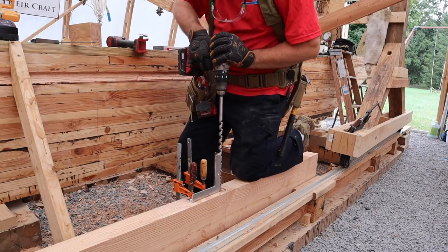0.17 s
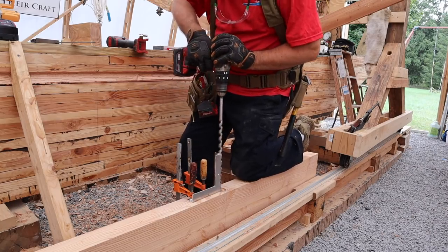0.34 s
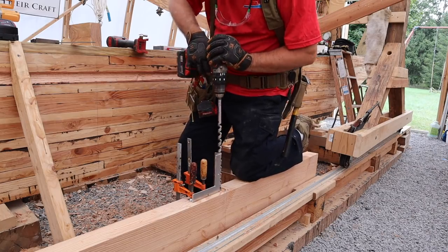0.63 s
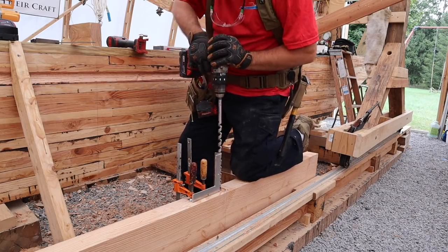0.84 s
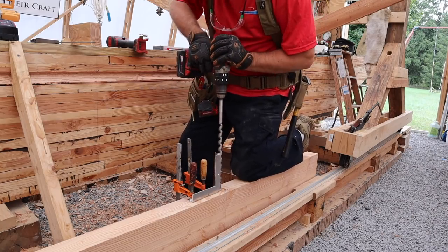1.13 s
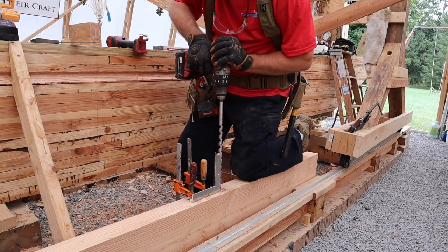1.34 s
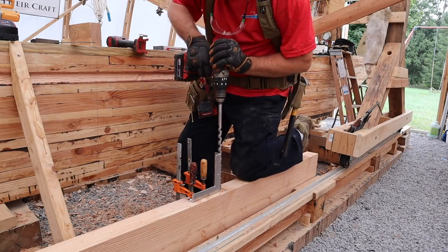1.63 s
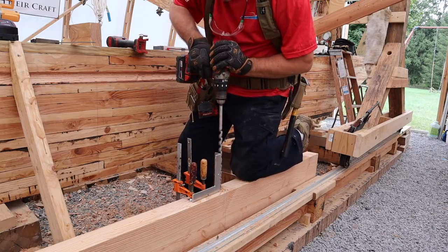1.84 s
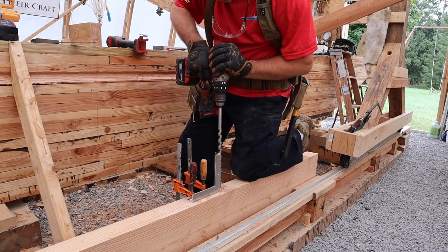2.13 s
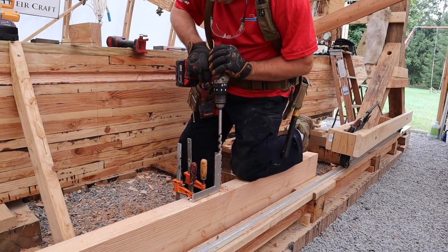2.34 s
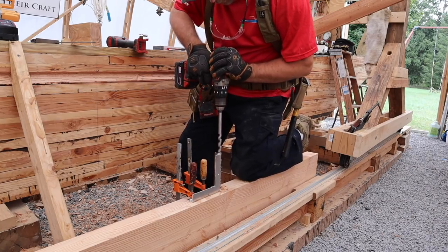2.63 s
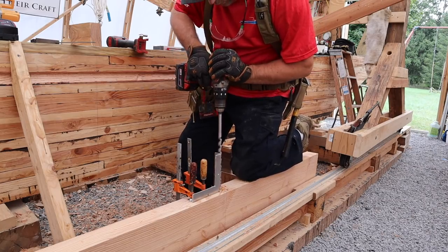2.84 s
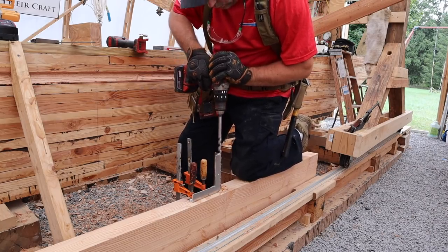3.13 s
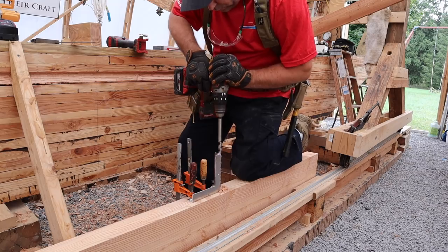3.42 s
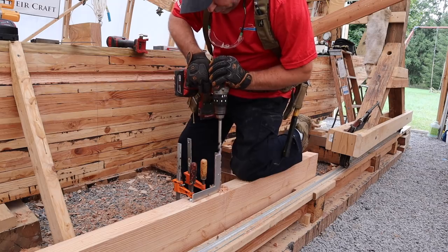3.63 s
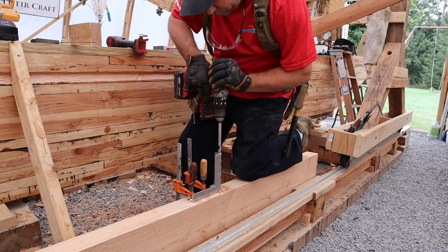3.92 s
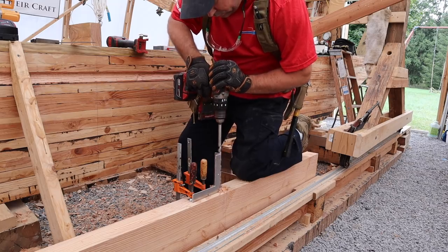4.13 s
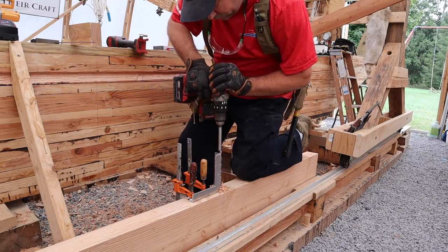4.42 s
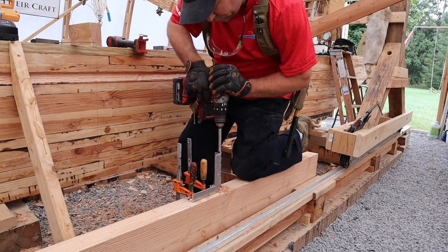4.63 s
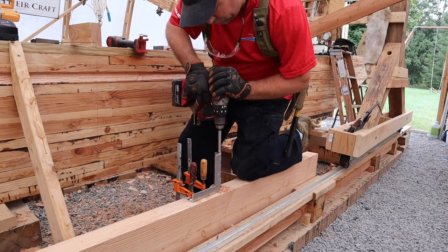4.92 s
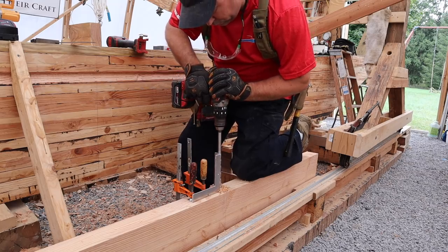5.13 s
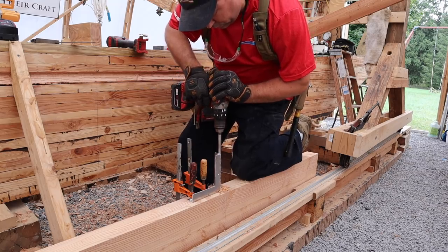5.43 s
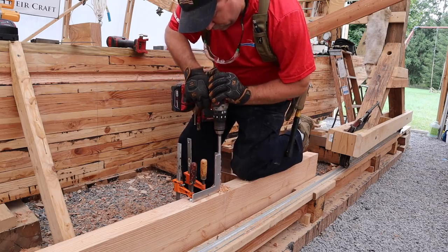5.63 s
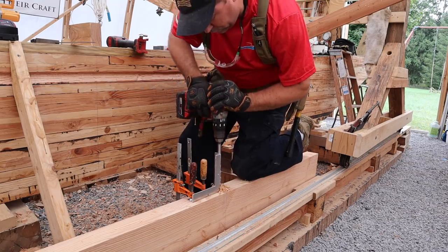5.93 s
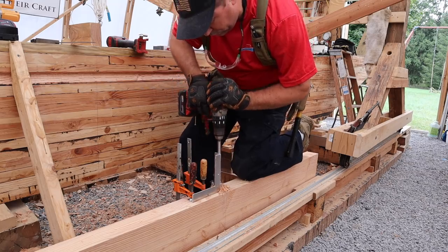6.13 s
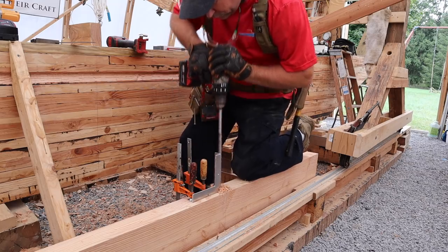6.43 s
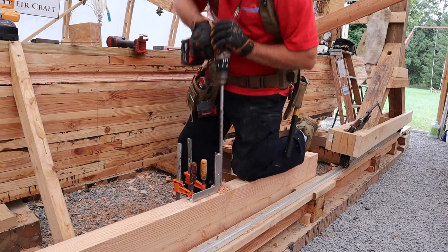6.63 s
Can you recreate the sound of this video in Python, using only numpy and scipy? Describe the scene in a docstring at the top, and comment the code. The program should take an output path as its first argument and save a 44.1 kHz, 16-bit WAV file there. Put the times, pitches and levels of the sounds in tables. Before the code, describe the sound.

Close and dry under an open outdoor shelter, a cordless drill gives a dying whirr, a short growling burst and a pause, then one long push into a timber beam. Gear whine wavers under load over pulsing scrape and crackling chips. Late on, the bit breaks through, the motor jumps to a higher, cleaner whirr, and the auger knocks resonantly in its hole.

```python
"""Under an open shelter, a cordless drill drives a long auger bit into a timber beam, heard at one microphone.
After short starts comes one long push: gear tones whine under load and bands of noise scrape and crunch in
time with two cutters. The bit breaks through, the motor races free, and short resonant blows are the auger
knocking in its hole as it is drawn up. Gear whine, beam rumble and outdoor air arrive dry, as if from close by;
the other sounds bring back a thin patter of echoes."""
import sys
import numpy as np
from scipy import signal
from scipy.fft import rfft, irfft, next_fast_len
from scipy.io import wavfile
from scipy.ndimage import uniform_filter1d

SR = 44100
rng = np.random.default_rng(int(sys.argv[2]) if len(sys.argv) > 2 else 0)


def wav_out(sig):
    """Save sig, one row per channel (or a flat mono array), as 16-bit PCM at SR to the path in sys.argv[1]."""
    wavfile.write(sys.argv[1], SR, np.round(np.clip(np.atleast_2d(sig).T, -1, 1) * 32767).astype(np.int16))


N = 298992
TIME = np.arange(N) / SR


def amp(db):
    """Decibels to gain."""
    return 10 ** (np.asarray(db) / 20)


def unit(x):
    """Scales to an rms of one."""
    return x / np.sqrt(np.mean(x ** 2) + 1e-20)


def curve(rows):
    """Joins (start_s, value) rows by straight lines."""
    return np.interp(TIME, *np.transpose(rows))


def wander(rate_hz):
    """Smooth random drift of rms one, moving up to about the given rate."""
    size = next_fast_len(N)
    hz = np.fft.rfftfreq(size, 1 / SR)
    spectrum = rfft(rng.standard_normal(size)) / np.sqrt(1 + (hz / rate_hz) ** 4)
    return unit(irfft(spectrum, size)[:N])


# resonances of the beam and the drill pressed into it, at ring = 1:
# pitch_hz, width_hz, level_db (above the broad response)
BODY_MODES = [(112, 26, -8), (243.8, 23, 19.5), (381.6, 24.8, 8.5), (473, 84, 14), (549, 8.2, 18),
              (611, 14, -43), (682, 136, 16.5), (865, 70, 9), (1104, 16, 10.5), (1407, 106, 14.5),
              (1623, 88, 12), (2061, 70, 7), (2244, 310, 8.5), (3760, 220, 3.5), (7050, 440, 4),
              (8810, 300, 7.5)]


def colour(x, spectrum, ring=0., size=8192):
    """Causal filter: a broad spectrum, with the dB peaks of beam and drill scaled by ring."""
    hz = abs(np.fft.fftfreq(size, 1 / SR))
    points, levels = np.transpose(spectrum)
    db = np.interp(np.log(hz + 1), np.log(points), levels)
    for pitch_hz, width_hz, level_db in BODY_MODES:
        db = db + ring * level_db / (1 + (2 * (hz - pitch_hz) / width_hz) ** 2)
    # minimum phase: the response starts at once, with no ringing ahead of a blow
    response = np.fft.ifft(np.exp(np.conj(signal.hilbert(np.log(amp(db)))))).real
    return signal.oaconvolve(x, response[:size // 2])[:len(x)]


def add(mix, start_s, sound):
    """Mixes a sound in at its time."""
    part = mix[max(round(start_s * SR), 0):][:len(sound)]
    part += sound[:len(part)]


# pulls of the trigger: pressed_s, released_s, run_up_s, share (of the working speed)
TRIGGER_PULLS = [(-0.1, 0.045, 0.05, 0.62), (0.252, 0.61, 0.135, 1.0), (1.06, 7.0, 0.275, 1.0)]
# working speed with the trigger down, in the short cut, the long cut and the free run:
# start_s, speed (turns per second)
SHORT_CUT_SPEED = [(0.39, 268), (0.42, 268), (0.455, 243), (0.53, 235), (0.62, 219)]
LONG_CUT_SPEED = [(1.33, 221), (1.63, 236.8), (1.82, 226.2), (1.97, 243), (2.14, 237.6), (2.45, 244.3),
                  (2.76, 236.2), (2.98, 246.3), (3.25, 233.4), (3.9, 240.8), (4.55, 235.1), (5.05, 223.8),
                  (5.5, 223.5), (5.8, 240.7)]
FREE_RUN_SPEED = [(5.87, 274), (5.95, 310), (6.02, 332), (6.2, 346), (6.46, 354.5), (6.78, 356)]
COAST_S = 0.15  # the released motor loses speed with this time constant


def motor_speed():
    """Turns per second: each pull runs the motor up at constant power to what the wood allows; then it coasts."""
    working = curve(SHORT_CUT_SPEED + LONG_CUT_SPEED + FREE_RUN_SPEED)
    speed = np.zeros(N)
    for pressed_s, released_s, run_up_s, share in TRIGGER_PULLS:
        rising = np.sqrt(np.clip((TIME - pressed_s) / run_up_s, 0, 1))
        coasting = np.exp(-np.maximum(TIME - released_s, 0) / COAST_S)
        speed = np.maximum(speed, share * working * rising * coasting)
    return speed


def labouring(limit_hz=233):
    """From 0 to 1 as the motor turns below its working speed, as when the cut drags it down."""
    return np.clip((limit_hz - motor_speed()) / 8, 0, 1)


def surging():
    """From 0 to 1 as the motor gathers speed."""
    smooth_speed = uniform_filter1d(motor_speed(), size=3000)
    return np.clip(np.gradient(smooth_speed) * SR / 500, 0, 1)


FULL_VOICE_HZ = 169  # below this motor speed the drill's noises fall away
RELEASE_S, RELEASE_DB = 0.081, -9.5  # the cutters let go of the wood as the trigger is released


def voice_db(power):
    """A slow drill is quiet, by a power of its speed, and quieter still with the trigger released."""
    held = np.zeros(N)
    for pressed_s, released_s, _, _ in TRIGGER_PULLS:
        time_left = released_s + RELEASE_S - TIME
        held += np.clip(np.minimum(TIME - pressed_s, time_left) / RELEASE_S, 0, 1)
    slowness = np.clip(motor_speed() / FULL_VOICE_HZ, 1e-3, 1)
    return power * 20 * np.log10(slowness) + RELEASE_DB * (1 - held)


TURNS_PER_BITE = 7.5  # motor turns to one pass of a cutter, before the passes are drawn onto the hard bites


def cutter_passes(turns, lag=0.0032):
    """Counts the passes of the cutters: a whole number at each pass, and so just after each hard bite starts."""
    passes = turns / TURNS_PER_BITE
    at_bites = np.interp(np.transpose(HARD_BITES)[0] + lag, TIME, passes)
    whole = np.r_[0, np.cumsum(np.round(np.diff(at_bites)))]
    return passes + np.interp(passes, at_bites, whole - at_bites)


def cutter_pressure(turns, sharpness=0.78):
    """Peaks each time a cutter meets the grain."""
    return np.exp(sharpness * (np.cos(2 * np.pi * cutter_passes(turns)) - 1))


def fibres(count, snaps_per_s=2800, spread_db=1.0, hiss=0.96):
    """Wood fibres snap in uneven sizes over a smooth rubbing hiss."""
    sizes = amp(spread_db * np.minimum(rng.exponential(1, count), 3)) * rng.choice([-1, 1], count)
    snaps = unit(sizes * (rng.random(count) < snaps_per_s / SR))
    return unit(snaps + hiss * rng.standard_normal(count))


# outdoor air at the microphone: pitch_hz, level_db (per Hz, relative)
AIR_SPECTRUM = [(12, -65), (20, -50), (87, -13), (147, -18.5), (194, -37), (571, -35.5), (713, -33),
                (1170, -46), (1350, -37), (1730, -49), (2280, -42.5), (15000, -63)]


def outdoor_air(level_db=-53.5):
    """Steady noise, shaped to the low hum and faint hiss of the open air."""
    return amp(level_db) * unit(colour(rng.standard_normal(N), AIR_SPECTRUM))


# rumble with the motor up to speed, before the trim in beam(): start_s, level_db
RUMBLE_LEVEL = [(0.0, -32), (0.55, -33), (1.25, -35.5), (2.2, -39), (5.4, -45.5), (6.05, -39),
                (6.29, -30.5), (6.45, -35.5), (6.78, -49)]
# broad response of the beam: pitch_hz, level_db (per Hz, relative)
BEAM_SPECTRUM = [(20, -50), (30, -27.5), (45, -10), (70, -5), (130, 4.5), (190, 7), (310, -3), (500, -10),
                 (800, -24), (2000, -24)]


def rumble_db(power=1.44):
    """Level of the rumble, which dies away more slowly than the hiss."""
    return curve(RUMBLE_LEVEL) + voice_db(power)


def beam(level_db=-3.5, lump_db=2.5):
    """The turning auger shakes the beam into its low modes, as lumpy filtered noise."""
    drive = rng.standard_normal(N) * amp(lump_db * wander(22.4))
    return amp(rumble_db() + level_db) * unit(colour(drive, BEAM_SPECTRUM, ring=0.73))


# scraping and motor hiss with the motor up to speed; other drill sounds follow it: start_s, level_db
SCRAPE_LEVEL = [(0.0, -27), (0.41, -27.5), (0.5, -30), (0.62, -33.5), (1.2, -26), (1.6, -32), (3.8, -32.5),
                (5.5, -32.5), (5.8, -31.5), (6.02, -34), (6.7, -35), (6.78, -38)]


def scrape_db(power=2.55):
    """Level of the scraping and hiss, which the motor and gear-tooth sounds follow too."""
    return curve(SCRAPE_LEVEL) + voice_db(power)


# motor, fan and gear tones, against the scraping level:
# order (multiple of the motor speed), loaded_db, free_db (running free)
MOTOR_TONES = [(1, -16, -24), (2, -26, -12), (3, -40, -16), (4, -30, -16), (5, -30, -18), (6, -15, -8),
               (7, -20, -6.5), (10, -1.5, -5.5), (12, -18, -10), (13, -25, -14), (15, -14, -4.5),
               (30, -24, -18), (33, -28, -33), (38, -35, -32), (40, -33, -24)]


def motor(turns, load):
    """Tones locked to the motor shaft: smeared by the load, cleaner when it runs free."""
    angle = turns + (.003 + .006 * load) * wander(20)
    up_to_speed = np.clip(motor_speed() / 235, 0, 1) ** 3  # a slow motor hardly sings
    out = np.zeros(N)
    for order, loaded_db, free_db in MOTOR_TONES:
        level = load * amp(loaded_db) + (1 - load) * amp(free_db)
        flutter = amp(3 * wander(16))
        out += level * flutter * np.sin(2 * np.pi * (order * angle + rng.random()))
    return out * up_to_speed * amp(scrape_db())


# fuzzy bands of rattling gear teeth, before the trims in grinding():
# order (multiple of the motor speed), half_width_hz, steady_db (steady cutting), labour_db (motor labouring)
RATTLE_BANDS = [(10.23, 179, -11, -7), (11.53, 296, -13, -9.5), (16.26, 110, -34, -25),
                (33.8, 50, -29, -25)]


def grinding(turns, load, free_db=-30.0, surge_db=-9.5):
    """Gear teeth rattle in narrow bands that follow the motor, weaker as it gathers speed or runs free."""
    labour, out = labouring(), np.zeros(N)
    for order, half_width_hz, steady_db, labour_db in RATTLE_BANDS:
        fuzz = wander(half_width_hz) + 1j * wander(half_width_hz)
        band = fuzz * np.exp(2j * np.pi * order * turns)
        out += band.real * amp(steady_db + (labour_db - steady_db) * labour)
    db = scrape_db() + free_db * (1 - load) + surge_db * surging()
    return out * np.clip(motor_speed() / 225, 0, 1) ** 2 * amp(db)


# gear-tooth tones, against the scraping level:
# order (multiple of the motor speed), steady_db (steady cutting), surge_db (speeding up)
TOOTH_ORDERS = [(10, -30, -1), (15, -30, -5), (30.2, -17, -22), (34, -21, -15), (45, -22, -30)]


def tooth_tones(turns, load):
    """Thin, wavering tones of the gear teeth, whose balance shifts while the motor speeds up."""
    surge = surging()
    angle = turns + (.012 + .008 * surge) * wander(24)
    out = np.zeros(N)
    for order, steady_db, surge_db in TOOTH_ORDERS:
        level = load * (1 - surge) * amp(steady_db) + surge * amp(surge_db)
        out += level * np.sin(2 * np.pi * order * angle)
    return out * np.clip(motor_speed() / 225, 0, 1) ** 2 * amp(scrape_db())


# scraping in the wood, and the rush of the free motor: pitch_hz, level_db (per Hz, relative)
SCRAPE_SPECTRUM = [(150, -24.5), (400, -15), (600, -5.5), (900, 0), (1300, -2), (1850, -4), (2600, -0.5),
                   (3200, -4), (4500, -1), (6000, -8), (8000, -16), (11000, -19), (15500, -24)]
RUSH_SPECTRUM = [(150, -39), (400, -4.5), (700, -5), (1200, 1.5), (1800, -8.5), (2400, -4), (3100, -5),
                 (4400, 0.5), (5600, -5), (7500, -13), (11000, -16.5), (15500, -22)]


def cutting(turns, load, cut_db=3.5, race_db=2.0, throb=0.41, uneven_db=6.0, flicker_db=0.57):
    """The cutters scrape in pulses; without load only the rush of fan and gearbox is left."""
    uneven = amp(uneven_db * np.tanh(wander(26)))
    pressure = unit(1 + throb * cutter_pressure(turns) * uneven)
    rubbing = fibres(N) * pressure * amp(flicker_db * wander(110))
    scrape = unit(colour(rubbing, SCRAPE_SPECTRUM, ring=0.66))
    rush = unit(colour(rng.standard_normal(N), RUSH_SPECTRUM, ring=0.44))
    loaded = amp(cut_db) * np.sqrt(load) * scrape
    free = amp(race_db) * np.sqrt(1 - load) * rush
    return amp(scrape_db()) * (loaded + free)


# gear whine with the motor up to speed, before housing lift and load: start_s, level_db
WHINE_LEVEL = [(0.05, -44.5), (0.3, -47), (0.39, -21.5), (0.51, -21), (0.62, -32), (0.67, -41),
               (1.19, -24.5), (1.5, -27), (4.65, -28.5), (4.85, -31.5), (5.55, -30), (5.7, -28),
               (5.85, -39)]
# the housing favours the whine near one pitch: pitch_hz, width_hz, lift_db
HOUSING_MODE = (708, 31, 6.4)


def whine_db(power=4.9):
    """Level of the gear whine, lifted where its pitch meets the resonance of the housing."""
    hz, width_hz, lift_db = HOUSING_MODE
    pitch_hz = 3 * motor_speed()
    return curve(WHINE_LEVEL) + voice_db(power) + lift_db / (1 + (2 * (pitch_hz - hz) / width_hz) ** 2)


# planet gears swing the whine: order (multiple of the motor speed), level_db (relative)
GEAR_MESH = [(2.907, -18), (3, 0), (3.093, -12)]


def gears(turns, load, flutter_db=4.0, labour_db=4.0, throb_db=3.0, throb_lag=0.084, level_db=-2.5):
    """The loaded gear mesh whines; when the motor is dragged down it stutters and throbs with the cutters."""
    labour = labouring()
    angle = turns + .016 * (1 + labour) * wander(20)
    tone = np.zeros(N)
    for order, tone_db in GEAR_MESH:
        tone += amp(tone_db) * np.sin(2 * np.pi * (order * angle + rng.random()))
    stutter = amp((flutter_db + labour_db * labour) * np.tanh(wander(58)))
    throb = amp(throb_db * labour * np.cos(2 * np.pi * (cutter_passes(turns) - throb_lag)))
    return unit(tone) * stutter * throb * load * amp(whine_db() + level_db)


# ticks and knocks of the auger in the hole, before the trims in knocks():
# start_s, level_db, pitch_hz (centre of the tone), chatter_s (decay time of the contacts)
AUGER_KNOCKS = [(0.202, -48, 2410, 0.0044), (0.902, -51.5, 3000, 0.0035), (1.016, -52, 2340, 0.0034),
                (1.076, -45, 2980, 0.0016), (5.867, -17.5, 2388, 0.0026), (5.896, -15.5, 1634, 0.0029),
                (5.926, -18.5, 1120, 0.004), (5.944, -23, 990, 0.0042), (6.158, -26, 714, 0.0085),
                (6.292, -19, 557, 0.0046), (6.302, -18.5, 386.6, 0.00096), (6.303, -19, 1320, 0.0026),
                (6.32, -30, 405, 0.019), (6.533, -23, 655, 0.0054), (6.579, -24, 648, 0.0063),
                (6.601, -22.5, 780, 0.011), (6.6406, -14.5, 950, 0.0024), (6.684, -29, 1043, 0.0143)]
# the steel auger rings when struck: pitch_hz, level_db (relative), t60_s
AUGER_MODES = [(383.2, -3.5, 0.197), (555, -4.5, 0.18), (730, -18, 0.08), (1084, 1.5, 0.065),
               (1270, -21, 0.045), (1790, -10, 0.2)]


def knocks(low_db=-10, high_db=-17, level_db=-4.0, ring_db=-2.5, rise_s=0.0012, count=12000):
    """The auger strikes the wall of the hole in a quick cluster of contacts, and rings on briefly."""
    t, out = np.arange(count) / SR, np.zeros(N)
    for start_s, knock_db, hz, chatter_s in AUGER_KNOCKS:
        force = rng.choice([-1., 1.], count) * t / chatter_s * np.exp(-t / chatter_s)
        tone = [(hz / 8, 2.5 * low_db), (hz / 2.5, low_db), (hz / 1.3, 0),
                (hz * 1.2, 0), (hz * 3, high_db), (hz * 8, 2 * high_db)]
        blow = colour(force, tone, ring=1.0)
        blow *= np.sqrt(.01 * SR) / np.linalg.norm(blow)  # the energy of 10 ms at an rms of one
        ring = np.zeros(count)
        for pitch_hz, mode_db, t60_s in AUGER_MODES:
            # each blow wakes mostly the modes near its own tone
            nearness = np.exp(-3 * np.log(pitch_hz / hz) ** 2)
            ring += amp(mode_db - 60 * t / t60_s) * nearness * np.sin(2 * np.pi * pitch_hz * t)
        ring *= 1 - np.exp(-t / rise_s)
        add(out, start_s, amp(knock_db) * (amp(level_db) * blow + amp(ring_db) * ring))
    return out


# levels before the trim in bites(); bites hit harder when the motor labours
CHIP_DB, CHIP_LABOUR_DB, CHIP_SPREAD_DB = -31.5, 7, 3.5


def lesser_bites(turns, load, power=8.4, lead_s=0.003, count=400):
    """Rows (start_s, level_db): one bite of chance strength for each pass in the wood between the hard bites."""
    at = np.flatnonzero(np.diff(np.floor(cutter_passes(turns))) > 0)
    chance = np.clip(rng.standard_normal(count), -2, 2)[:len(at)]
    typical_db = CHIP_DB + CHIP_LABOUR_DB * labouring() + voice_db(power)
    db = typical_db[at] + CHIP_SPREAD_DB * chance
    apart = abs(TIME[at, None] - np.transpose(HARD_BITES)[0]).min(1) > .015
    in_wood = load[at] > .5
    return [(s - lead_s, d) for s, d, keep in zip(TIME[at], db, apart & in_wood) if keep]


# the hardest bites of a cutter, before trim and colouring: start_s, level_db
HARD_BITES = [(0.4199, -15.5), (0.4492, -17), (0.6245, -17), (1.1726, -16), (1.362, -15.5), (1.4319, -14.5),
              (1.499, -16), (1.6915, -20.5), (1.8551, -22), (2.3266, -20.5), (2.4832, -20), (2.6699, -15.5),
              (2.7332, -21), (3.3629, -17.5), (4.6912, -19), (4.7611, -18), (5.2061, -19), (5.3473, -18.5),
              (5.5917, -16.5), (5.7211, -16)]
# tearing chips: pitch_hz, level_db (per Hz)
CRUNCH_SPECTRUM = [(150, -27), (600, -8), (1400, 1.5), (2500, -2.5), (4000, 3.5), (6000, -0.5), (9000, -8),
                   (15500, -11)]


def bites(turns, load, rise_s=0.0026, level_db=-1.5, count=2000):
    """A bite tears off a chip in a quick crackling burst."""
    t, out = np.arange(count) / SR, np.zeros(N)
    swell = t / rise_s * np.exp(1 - t / rise_s)
    for start_s, bite_db in HARD_BITES + lesser_bites(turns, load):
        crackle = fibres(count, snaps_per_s=6900, spread_db=1.0, hiss=0.49)
        add(out, start_s, amp(bite_db + level_db) * crackle * swell)
    return colour(out, CRUNCH_SPECTRUM, ring=0.61)


# deep in the hole the auger rubs the wall with a thin squeal: start_s, pitch_hz, level_db
WALL_SQUEAL = [(4.68, 5250, -75), (4.8, 5200, -42), (5.0, 4950, -40), (5.2, 4900, -41), (5.4, 5050, -40),
               (5.65, 5250, -41), (5.78, 5300, -75)]


def squeal(width_hz=110):
    """A fuzzy whistle: friction keeps one mode of the auger ringing."""
    start_s, pitch_hz, level_db = np.transpose(WALL_SQUEAL)
    angle = 2 * np.pi * np.cumsum(np.interp(TIME, start_s, pitch_hz)) / SR
    ringing = unit(wander(width_hz) * np.cos(angle) + wander(width_hz) * np.sin(angle))
    return ringing * np.interp(TIME, start_s, amp(level_db), left=0, right=0)


def shelter(x, wet_db=-14, t60_s=0.18, echoes_per_s=1500, count=9000):
    """Planking and roof throw back a short, thin patter of echoes."""
    t = np.arange(count) / SR
    taps = rng.choice([-1., 1.], count) * (rng.random(count) < echoes_per_s / SR)
    taps *= (t > .005) * amp(-60 * t / t60_s)  # nothing returns in the first 5 ms
    return x + amp(wet_db) * signal.oaconvolve(x, taps / np.linalg.norm(taps))[:N]


def scene():
    """The drill and the outdoor air at one microphone, the same on both channels."""
    speed = uniform_filter1d(motor_speed(), size=900)
    turns = np.cumsum(speed) / SR
    load = np.clip((322 - speed) / 62, 0, 1)  # the motor only races when the wood lets go
    drill = motor(turns, load) + grinding(turns, load) + tooth_tones(turns, load)
    wood = cutting(turns, load) + knocks() + bites(turns, load) + squeal()
    mix = outdoor_air() + beam() + gears(turns, load) + shelter(drill + wood)
    return np.array([mix, mix])


def record(dry, edge_hz=15900):
    """The band limit of the recorder: a steep low-pass."""
    low_pass = signal.firwin(511, edge_hz, window=("kaiser", 9), fs=SR)
    return signal.oaconvolve(dry, low_pass[None], "same")


dry = scene()
out = record(dry)
wav_out(out)
```